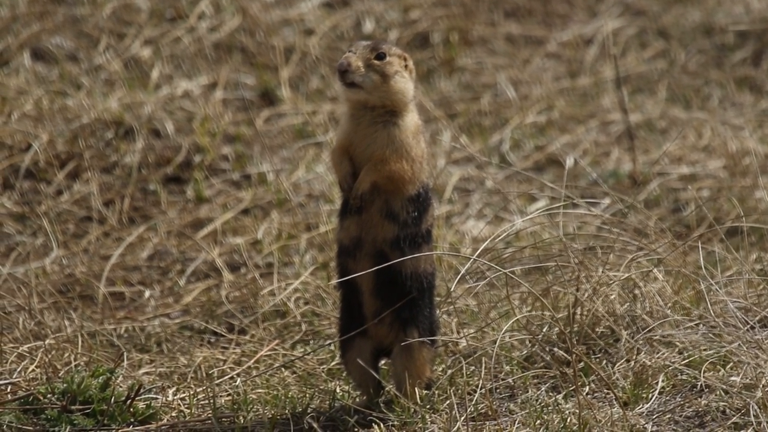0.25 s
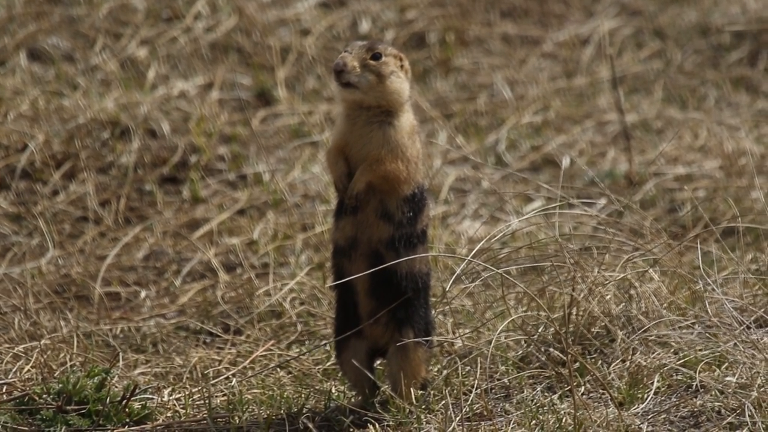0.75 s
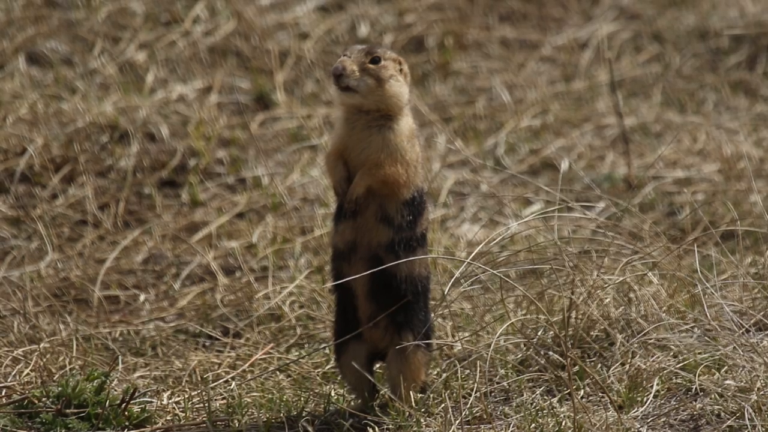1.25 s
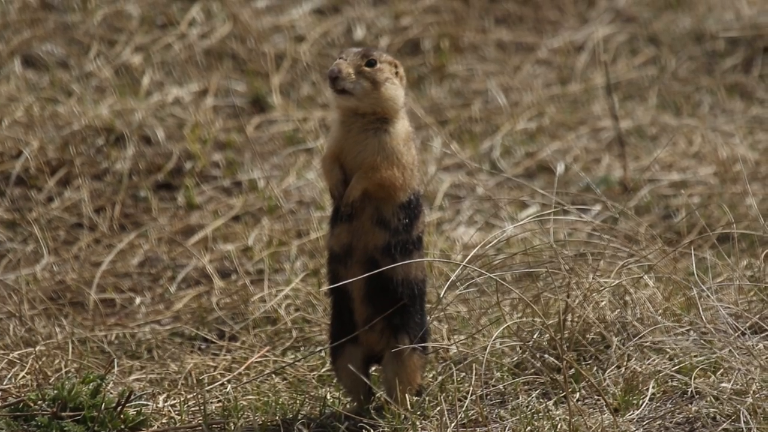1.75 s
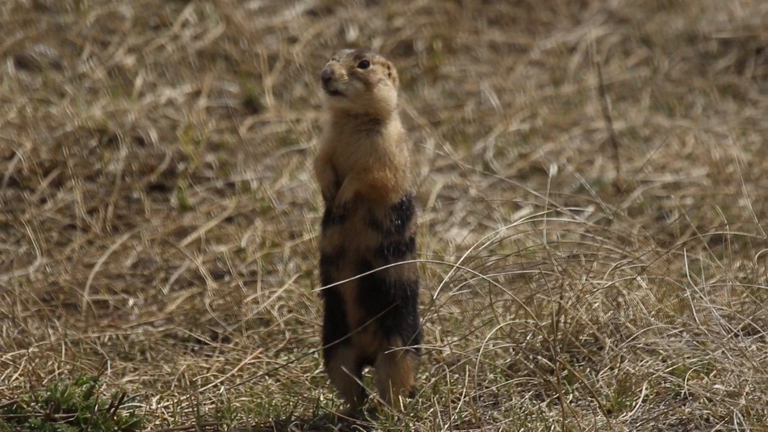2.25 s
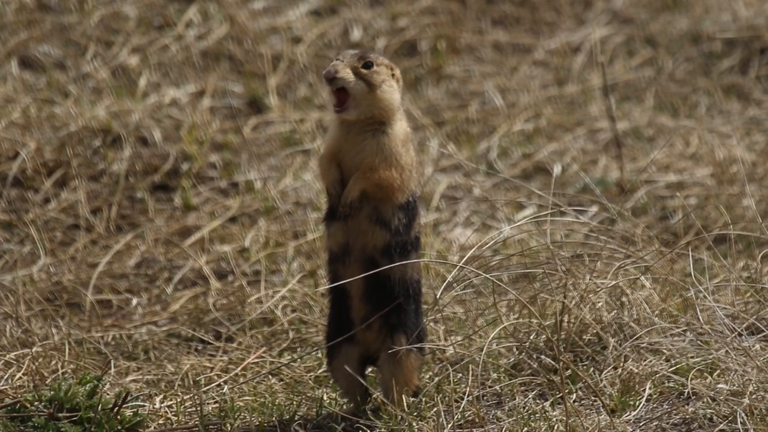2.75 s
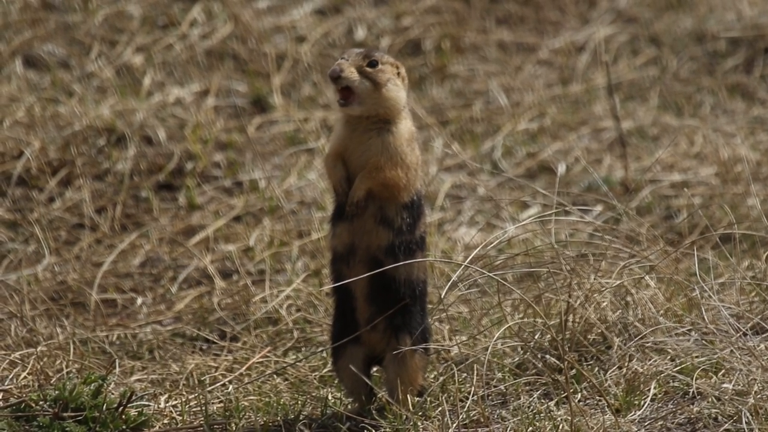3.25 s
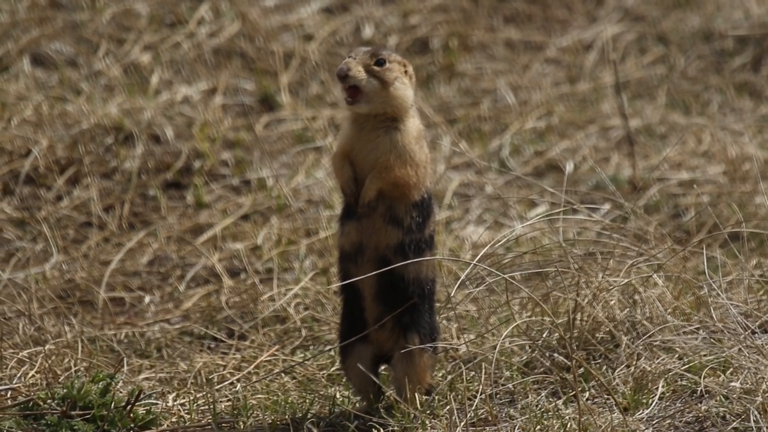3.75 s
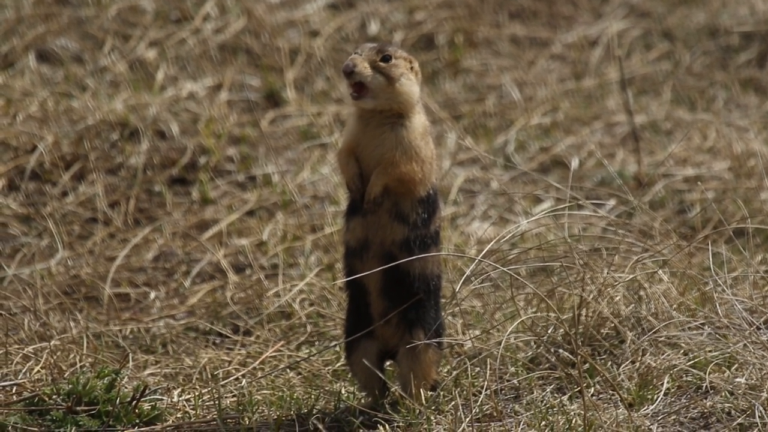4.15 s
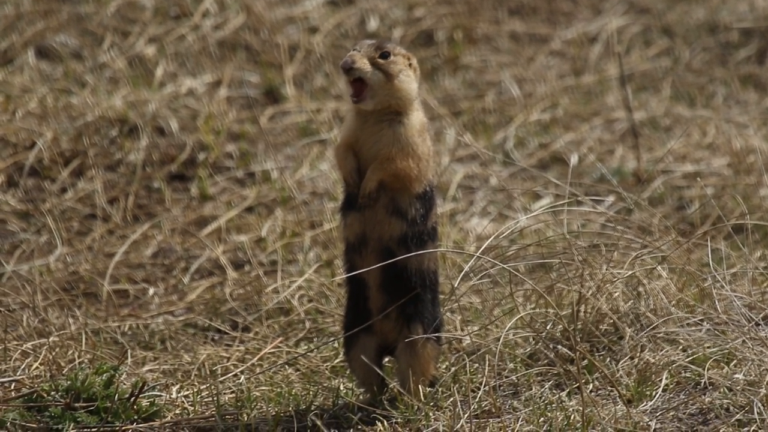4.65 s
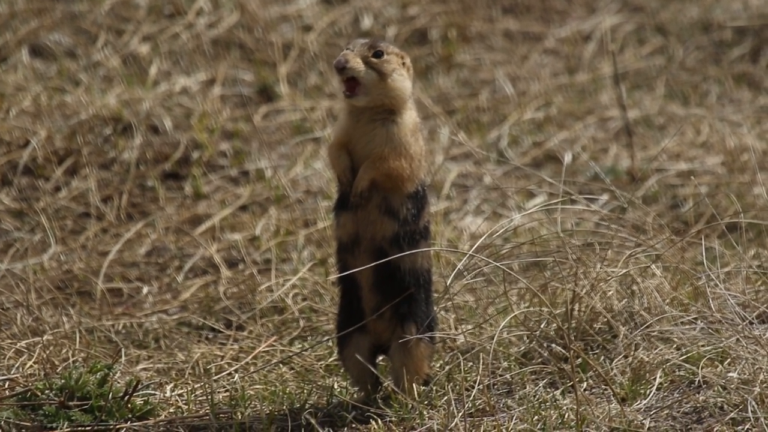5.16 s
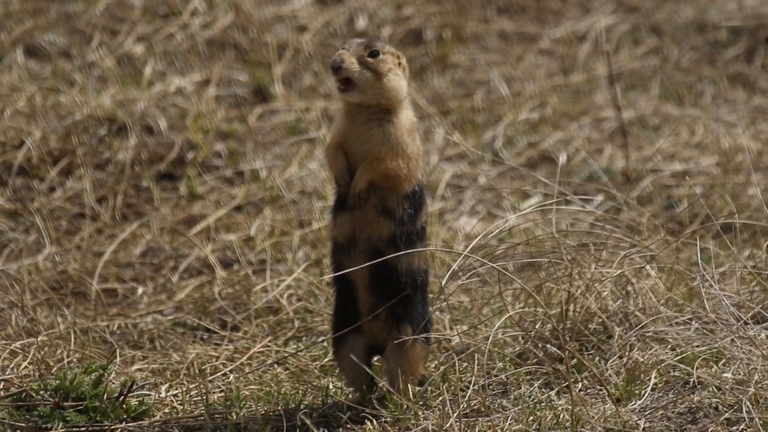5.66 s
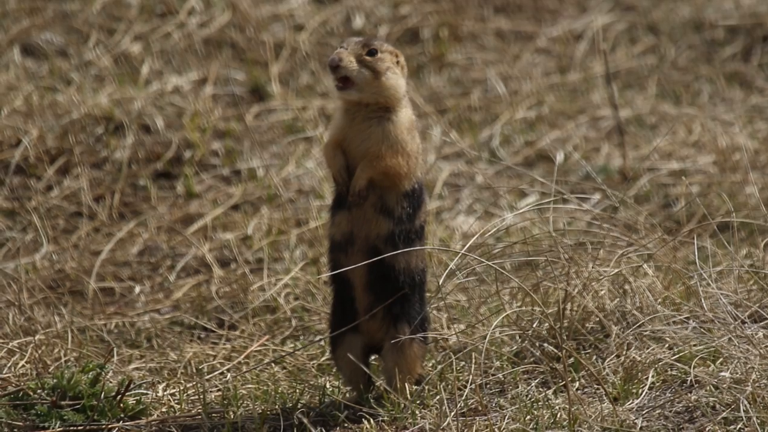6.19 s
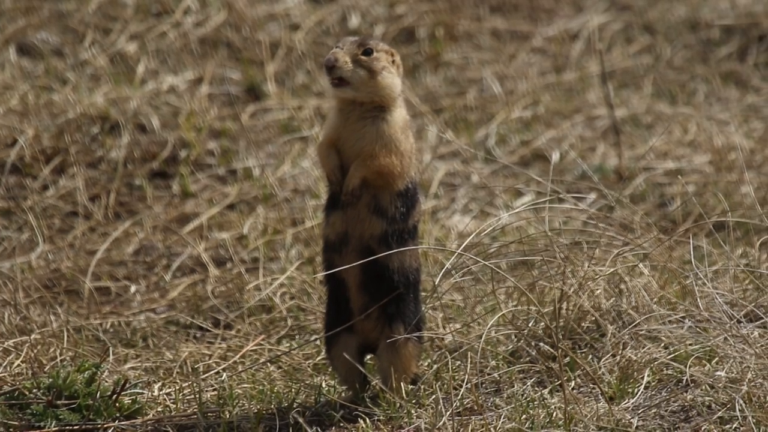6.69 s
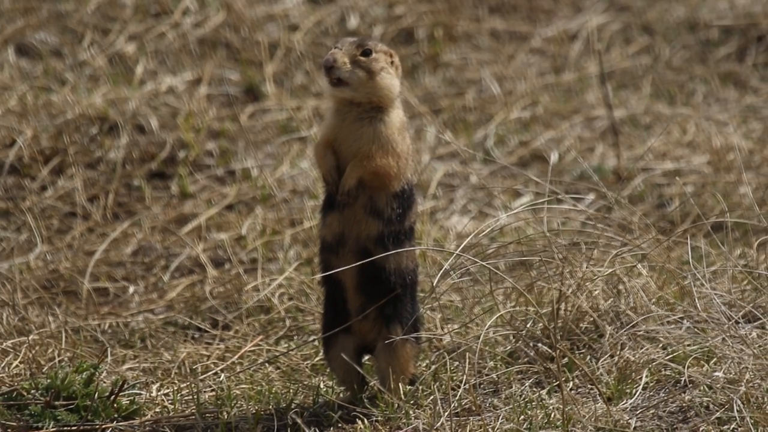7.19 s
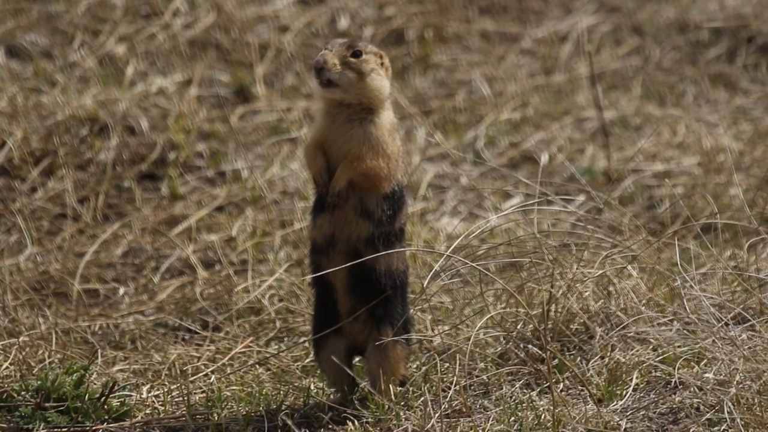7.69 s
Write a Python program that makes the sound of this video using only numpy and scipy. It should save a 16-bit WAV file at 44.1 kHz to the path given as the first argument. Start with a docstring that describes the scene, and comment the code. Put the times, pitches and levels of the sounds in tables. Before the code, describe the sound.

Uneven low wind buffets a microphone in open grassland as a small rodent repeats short, piercing yaps, with faint bird whistles after.

```python
"""From the start, gusts buffet a microphone in open grassland: shaped noise, with a suction dip for each eddy.
From two seconds a prairie dog wheezes, half voice and half hiss through a nearly shut mouth.
Then come nine alarm barks, trains of sharp vocal pulses whose pitch arches up and down; the last
wheezes fall among the first barks. The grass scatters a short tail behind the calls.
Afterwards far birds whistle faintly as gliding sines, and a grass stem ticks once, a burst of noise."""
import sys
import numpy as np
from scipy import signal
from scipy.fft import rfft, irfft
from scipy.io import wavfile
from scipy.ndimage import uniform_filter1d, map_coordinates

SR = 44100
rng = np.random.default_rng(int(sys.argv[2]) if len(sys.argv) > 2 else 0)


def inscribe(sig):
    """Save sig as 16-bit PCM at rate SR to the path in sys.argv[1].

    A 1-D sig is mono; a 2-D sig holds one channel per row.
    Samples are clipped to [-1, 1] before scaling.
    """
    pcm = np.round(np.clip(np.atleast_2d(sig).T, -1, 1) * 32767)
    wavfile.write(sys.argv[1], SR, pcm.astype(np.int16))


N = 349747
TIME = np.arange(N) / SR

# still air over the prairie and microphone hiss: (frequency [Hz], relative density [dB per Hz])
AIR_COLOUR = [(30, 5), (120, -1.5), (300, -3.5), (410, 4.5), (540, -3), (660, 0), (850, -8), (1700, -12),
              (2500, -10.5), (3300, -15), (4700, -19.5), (8000, -18), (15000, -23)]
# wind strength as rumble on the microphone, before puffs and trim: (time [s], level [dB])
WIND_STRENGTH = [(0, -25.5), (0.15, -26.5), (0.3, -47.5), (0.45, -47.5), (0.87, -22.5), (1.18, -29),
                 (1.36, -52.5), (1.44, -21), (1.63, -59), (1.72, -21), (2.0, -32.9), (2.09, -19.5),
                 (2.28, -35), (2.78, -30), (2.87, -37.5), (3.33, -36.5), (3.42, -29.5), (3.87, -29),
                 (4.2, -22.5), (5.3, -23.5), (5.7, -30.5), (5.85, -17.5), (5.98, -29.5), (6.38, -30),
                 (6.47, -49), (6.56, -25.5), (6.66, -44.5), (6.95, -64), (7.05, -32), (7.35, -44.5),
                 (7.55, -27.5), (7.7, -44), (7.87, -24), (7.93, -41)]
# deep rumble of the wind: (frequency [Hz], relative density [dB per Hz])
RUMBLE_COLOUR = [(20, -9), (35, -12.5), (60, 0.5), (95, 3), (150, -1), (220, -11.5), (320, -24),
                 (500, -54.5)]
# higher flutter of the wind: (frequency [Hz], relative density [dB per Hz])
FLUTTER_COLOUR = [(130, -14.5), (220, 2.5), (330, -0.5), (480, -11.5), (700, -20), (1000, -40.5),
                  (1600, -64)]
# single buffets, strong to slight, each an eddy hitting the microphone:
# (time [s], peak before trim [dB], half passing time [s])
BUFFET_EDDIES = [(.154, -8, 0.0026), (.572, -12, .003), (.7, -14.5, 0.0027), (.846, -7, .0015),
                 (1.024, -6, 0.00089), (1.062, -10, 0.00088), (1.146, -10, 0.0014), (1.285, -19.5, 0.0028),
                 (1.734, -12, 0.00074), (1.76, -8, 0.0017), (1.81, -4.5, 0.0015), (1.898, -9, 0.0013),
                 (2.11, -17, 0.0023), (2.205, -10, 0.00095), (2.362, -7, 0.0023), (2.94, -19, 0.0044),
                 (3.1, -16, 0.0045), (3.47, -20, 0.0031), (3.653, -9.5, 0.0014), (4.044, -14.5, 0.00098),
                 (4.223, -2.5, 0.0022), (4.356, -9.5, 0.0012), (4.417, 4, 0.0011), (4.47, -9, 0.00085),
                 (4.802, -8, 0.0014), (4.888, -4.5, 0.001), (4.924, -13.5, 0.00078), (5.037, -9, .002),
                 (5.146, -5, 0.00096), (5.337, -3, 0.0018), (5.401, -12, .0017), (5.789, -12.5, 0.00098),
                 (5.857, -5.5, 0.0019), (5.905, -15, 0.00081), (6.596, -17, 0.001), (7.463, -24, 0.00069)]
# a grass stem ticks: (time [s], level [dB], decay [s])
STEM_TICKS = [(7.541, -45, 0.0075)]
# colour of the tick: (frequency [Hz], relative density [dB per Hz])
STEM_COLOUR = [(400, -7), (1100, 6), (2000, -8), (4000, -16), (9000, -24)]
# far birds: (time [s], length [s], first pitch [Hz], last pitch [Hz], level [dB])
FAR_BIRDS = [(6.24, 0.057, 4700, 4500, -75), (6.37, .022, 6000, 5370, -64), (6.382, .025, 5500, 5900, -68),
             (6.656, 0.23, 3660, 2720, -68), (7.03, 0.089, 3610, 2950, -70.5),
             (7.38, 0.076, 4200, 3980, -74), (7.54, .1, 3550, 2920, -70)]
# colour of what ground and grass throw back: (frequency [Hz], relative density [dB per Hz])
SCATTER_COLOUR = [(600, 4), (1500, 0), (2600, 5.5), (4000, -0.5), (5500, -1), (8000, -1), (15000, -23)]
# wheezy half-voiced calls: (time of peak [s], rise [s], fall [s], level [dB], voiced share [0-1])
WHEEZE_CALLS = [(2.113, .0033, 0.023, -44, .8), (2.136, .014, 0.015, -44, 0.6),
                (2.238, .009, 0.014, -40.5, 0.64), (2.363, .012, 0.01, -39, 0.56),
                (2.429, .007, 0.012, -42.5, 0), (2.555, .0094, 0.013, -41, .36),
                (2.61, 0.0056, 0.013, -44.5, 0.06), (2.746, 0.0094, 0.056, -48, 0),
                (2.975, 0.012, 0.015, -50, .1), (3.112, .0094, 0.026, -47.5, 0.1),
                (3.166, 0.0064, 0.032, -51, .5)]
# resonances of the nearly shut mouth: (frequency [Hz], width [Hz], relative level [dB])
SHUT_MOUTH_MODES = [(2170, 610, 10.5), (3600, 1160, 1.5), (4060, 550, 5.5), (5800, 1200, -30),
                    (7680, 1540, 3), (10200, 1500, -7.5), (11200, 1400, -7.5)]
# barks: (start [s], crest [s], end [s], top pitch [Hz], attack level [dB])
ALARM_BARKS = [(2.7957, 2.839, 2.898, 1073, -17.5), (3.182, 3.23, 3.28, 1089, -17.5),
               (3.5578, 3.6014, 3.65, 1086, -17), (3.923, 3.961, 4.016, 1063, -17.5),
               (4.2954, 4.338, 4.385, 1060, -19), (4.696, 4.739, 4.783, 1035, -20),
               (5.131, 5.1777, 5.219, 1019, -22.5), (5.5233, 5.5647, 5.61, 1028, -19.5),
               (5.9214, 5.968, 6.011, 1049, -19.5)]
# throat and mouth resonances on the highest bark, before small differences from bark to bark:
# (frequency [Hz], width [Hz], level with the mouth open [dB], level with it closed [dB])
THROAT_MODES = [(820, 180, -44, -56), (2560, 380, 6.5, 5), (3180, 340, -7, -9.5), (3820, 850, 6.5, -7),
                (5180, 1630, -2, 3.5), (6260, 2000, -7.5, -14.5), (7230, 1070, -3.5, -0.5),
                (9550, 680, -7.5, -6), (10340, 890, -10, -22.5), (12400, 350, -17, -29),
                (14760, 600, -50, -43)]

AIR_DB = -55.5
# flutter grows faster than rumble: level in a moderate wind (dB), that wind (dB), dB gained per dB of wind
FLUTTER_DB, MODERATE_WIND_DB, FLUTTER_GROWTH = -48, -27, 1.55
# random eddies: rate, peak above the wind before trim (dB), spread (dB), middle half passing time (s)
EDDIES_PER_S, EDDY_DB, EDDY_SPREAD_DB, EDDY_PASSING_S = 10, 6, 1.5, 0.0012
# rough air around a buffet that passes in EDDY_PASSING_S, against its untrimmed peak (dB)
WAKE_RUMBLE_DB, WAKE_FLUTTER_DB = -15, -19.5
GROUND_DB = -14  # smeared bounce off the ground, against the direct sound
WHEEZE_HZ = 592  # pitch at the peak of a wheeze
# share of the top pitch missing at the start and end of a bark, before the floor on the arch
START_SAG, END_SAG = 0.62, 0.3
# aspiration before the folds pulse it: dB at the crest, dB added per unit of missing pitch share
CREST_RASP_DB, EDGE_RASP_DB = -21.5, 25
SLACK_HISS_DB = -24  # hiss through fully slack folds before its high-pass, against the voice
# first pulse, just after the crest, and as the mouth closes, against the attack level (dB)
ONSET_DB, CREST_DB, CLOSING_DB = -17, -5.5, -5.5
CUTOFF_HZ = 15900


def from_db(db):
    """Amplitude ratio of a level in dB."""
    return 10 ** (np.asarray(db) / 20)


def rms_one(x):
    """Scales a sound to rms 1."""
    return x / np.sqrt(np.mean(x ** 2) + 1e-20)


def even(x, window_s):
    """Holds the short-term rms at 1, leaving the faster lumps."""
    power = uniform_filter1d(x ** 2, size=int(window_s * SR))
    return x / np.sqrt(power + 1e-9)


def butter(x, hz, kind, order=2):
    """Causal low- or high-pass."""
    return signal.sosfilt(signal.butter(order, min(hz, .48 * SR), kind, fs=SR, output="sos"), x)


def noise(spectrum, size=N):
    """Noise with the given colour, falling away outside its end points; rms 1."""
    hz, db = np.transpose(spectrum)
    f = np.fft.rfftfreq(size, 1 / SR) + 1
    gain = from_db(np.interp(np.log(f), np.log(hz), db))
    gain = gain * np.minimum(1, hz[-1] / f) ** 2 * np.minimum(1, f / hz[0])
    return rms_one(irfft(rfft(rng.standard_normal(size)) * gain, size))


def drift(rate, size=N):
    """Smooth chance from about `rate` random knots a second, of spread 1 at the knots."""
    knots = np.arange(size) * rate / SR
    return map_coordinates(rng.standard_normal(size), [knots], order=3, mode="mirror")


def add(track, s, sound):
    """Mixes a sound in at time s."""
    i = int(s * SR)
    track[i:i + len(sound)] += sound[:N - i]


def air():
    """Still air and microphone hiss: steady coloured noise."""
    return from_db(AIR_DB) * noise(AIR_COLOUR)


def wind_db(t):
    """Strength of the wind at time t."""
    return np.interp(t, *np.transpose(WIND_STRENGTH))


def wake(rise_s, fall_s, speed_power):
    """Swell of rough air around the buffets; speed_power says how much more the fast ones count."""
    swell = np.zeros(N)
    for s, db, passing in BUFFET_EDDIES:
        weight = from_db(db) * (EDDY_PASSING_S / passing) ** speed_power
        away = (TIME - s) / np.where(TIME < s, rise_s, fall_s)
        swell += weight * np.exp(-np.minimum(away ** 2, 20))
    return swell


def wind(rumble_db, puff_db, puffs_per_s, rumble_lump_db, flutter_lump_db):
    """Wind on the microphone drops between puffs and swells at buffets; lumps shape flutter more than rumble."""
    strength_db = wind_db(TIME) + puff_db * np.clip(drift(puffs_per_s), -2, .5)
    flutter_db = FLUTTER_DB + FLUTTER_GROWTH * (strength_db - MODERATE_WIND_DB)
    rumble_wake = from_db(WAKE_RUMBLE_DB) * wake(rise_s=.014, fall_s=0.017, speed_power=0)
    flutter_wake = from_db(WAKE_FLUTTER_DB) * wake(rise_s=.013, fall_s=0.023, speed_power=0.78)
    low = np.hypot(from_db(strength_db + rumble_db), rumble_wake)
    high = np.hypot(from_db(flutter_db), flutter_wake)
    lumps = np.tanh(drift(55))
    rumble = low * even(noise(RUMBLE_COLOUR) * from_db(rumble_lump_db * lumps), window_s=0.07)
    flutter = high * even(noise(FLUTTER_COLOUR) * from_db(flutter_lump_db * lumps), window_s=0.06)
    return rumble + flutter


def random_eddies():
    """Random eddies that grow with the wind: (time [s], peak before trim [dB], half passing time [s])."""
    gap, size, speed = rng.random((200, 3)).T
    s = 0.036 + np.cumsum(2 * gap / EDDIES_PER_S)
    peak_db = wind_db(s) + EDDY_DB + EDDY_SPREAD_DB * (2 * size - 1)
    passing = EDDY_PASSING_S * 2 ** (speed - .5)
    rows = np.transpose([s, peak_db, passing])
    return list(rows[s < N / SR])


def eddies(gain_db, port_hz, core_share, core_width):
    """A passing eddy is brief suction with a tight core; the microphone's bass roll-off makes it swing back."""
    out = np.zeros(N)
    t = np.arange(-1500, 1500) / SR
    for s, db, passing in list(BUFFET_EDDIES) + random_eddies():
        core = core_share / (1 + (t / (passing * core_width)) ** 2)
        suction = 1 / (1 + (t / passing) ** 2) + core
        dip = butter(-np.hanning(len(t)) * suction, port_hz, "high")
        add(out, max(s + t[0], 0), from_db(db + gain_db) * dip / np.abs(dip).max())
    return out


def ticks():
    """A grass stem's dry snap: coloured noise that dies at once."""
    out, t = np.zeros(N), TIME[:SR // 10]
    for s, db, decay in STEM_TICKS:
        add(out, s, from_db(db) * noise(STEM_COLOUR, size=len(t)) * np.exp(-t / decay))
    return out


def birds():
    """Far, thin whistles: slightly unsteady sines whose glide flattens out."""
    out = np.zeros(N)
    for s, length, first_hz, last_hz, db in FAR_BIRDS:
        u = np.linspace(0, 1, int(length * SR))
        glide = last_hz + (first_hz - last_hz) * (1 - u) ** 1.7
        hz = glide * (1 + 0.0036 * drift(250, len(u)))
        whistle = np.sin(2 * np.pi * np.cumsum(hz) / SR) * np.sqrt(u) * (1 - u)
        add(out, s, from_db(db) * rms_one(whistle))
    return out


def grassland(x, ground_s, scatter_db, scatter_t60, far_db, far_t60):
    """A smeared bounce off rough ground, a short scatter from grass and mounds, and a faint far tail."""
    t = TIME[:SR]
    ground = noise(SCATTER_COLOUR, size=SR) * (t / ground_s) ** 2 * np.exp(-(t / ground_s) ** 2)
    near = noise(SCATTER_COLOUR, size=SR) * from_db(-60 * t / scatter_t60) * (1 - np.exp(-(t / 0.0055) ** 2))
    far = noise(SCATTER_COLOUR, size=SR) * from_db(-60 * t / far_t60) * (1 - np.exp(-t / .05))
    response = from_db(GROUND_DB) * rms_one(ground)
    response = response + from_db(scatter_db) * rms_one(near) + from_db(far_db) * rms_one(far)
    return x + signal.fftconvolve(x, response / np.sqrt(SR))[:N]


def resonate(x, modes, scale=1):
    """A tract with steep-sided resonances and dark valleys; causal, so each pulse stays a sharp spike."""
    size = 2 * len(x)
    f = np.fft.rfftfreq(size, 1 / SR)
    gain = sum(from_db(db) / (1 + (2 * (f - hz * scale) / width) ** 2) for hz, width, db in modes)
    # the folded cepstrum gives the minimum-phase response
    cepstrum = irfft(np.log(gain))[:len(x)]
    response = np.exp(2 * rfft(cepstrum, size) - cepstrum[0])
    return irfft(rfft(x, size) * response)[:len(x)]


def vocal_pulses(pitch, jitter):
    """One sharp pressure drop each time the folds close; also returns the cycle's phase."""
    hz = pitch * (1 + jitter * drift(688, len(pitch)))
    phase = 2 * np.pi * np.cumsum(hz) / SR
    k = np.arange(1, 40)[:, None]
    harmonics = np.cos(k * phase) * (k * pitch < SR / 2)
    return rms_one(-np.sum(harmonics, axis=0)), phase


def wheezes():
    """Soft calls before and among the first barks: weak pulses and hiss through the nearly shut mouth."""
    out, t = np.zeros(N), np.arange(int(.16 * SR)) / SR - .05
    for s, rise, fall, db, voiced in WHEEZE_CALLS:
        voiced = np.clip(voiced, 0, 1)
        pulses, _ = vocal_pulses(WHEEZE_HZ * (1 + 2.9 * t), jitter=0.016)
        source = np.sqrt(voiced) * pulses + np.sqrt(1 - voiced) * rng.standard_normal(len(t))
        sound = butter(resonate(source, SHUT_MOUTH_MODES), 1650, "high", order=4)
        swell = np.exp(-(t / np.where(t < 0, rise, fall)) ** 2 / 2)
        add(out, s + t[0], from_db(db) * rms_one(sound) * swell)
    return out


def bark(row, jitter, rise_power, fall_power, attack_s, release_s,
         throat_follow, gape_follow, mouth_s, throat_spread_db):
    """Pitch arches over the crest while the open mouth closes; the voice is raspier at both ends."""
    start, crest, end, top_hz, attack_db = row
    t = start + np.arange(int(.16 * SR)) / SR
    away = np.abs(t - crest) / np.where(t < crest, crest - start, end - crest)
    sag = np.where(t < crest, START_SAG * away ** rise_power, END_SAG * away ** fall_power)
    arch = np.clip(1 - sag, .36, 1)
    pulses, phase = vocal_pulses(top_hz * arch, jitter)
    rasp_level = from_db(CREST_RASP_DB + EDGE_RASP_DB * (1 - arch))
    source = pulses + rasp_level * (1 + np.cos(phase)) * rng.standard_normal(len(t))

    # more effort: shorter throat, wider gape
    effort = top_hz / max(other[3] for other in ALARM_BARKS)
    # no two barks alike: only the two level columns vary
    variation = rng.standard_normal((len(THROAT_MODES), 4)) * [0, 0, 1, 1]
    throat = np.array(THROAT_MODES) + throat_spread_db * variation
    opened = resonate(source, throat[:, [0, 1, 2]], effort ** throat_follow)
    closed = resonate(source, throat[:, [0, 1, 3]], effort ** throat_follow)
    gape = effort ** gape_follow * (1 - np.tanh((t - crest) / mouth_s)) / 2
    voice = butter(gape * opened + (1 - gape) * closed, 439, "high")

    # slack folds close softly and lose the top
    press = np.clip(effort * arch, 0, 1) ** 4.3
    soft = signal.sosfiltfilt(signal.butter(2, 10500, fs=SR, output="sos"), voice)
    voice = even(press * voice + (1 - press) * soft, window_s=.007)
    hiss = butter(rng.standard_normal(len(t)), 4000, "high")
    voice = voice + from_db(SLACK_HISS_DB) * (1 - arch ** 2) * hiss

    knots = [start, start + attack_s, start + 0.023, crest + 0.019, end - .012, end, end + release_s]
    shape_db = [ONSET_DB, -.5, 0, CREST_DB, CLOSING_DB, CLOSING_DB - 5.0, -46]
    level_db = attack_db + np.interp(t, knots, shape_db)
    return voice * from_db(level_db) * (t < end + release_s)


def barks():
    """The alarm series, each bark shaped by its own pitch and effort."""
    out = np.zeros(N)
    for row in ALARM_BARKS:
        sound = bark(row, jitter=0.0024, rise_power=2.4, fall_power=2.3, attack_s=0.012, release_s=0.048,
                     throat_follow=0.17, gape_follow=7.4, mouth_s=0.012, throat_spread_db=0.25)
        add(out, row[0], sound)
    return out


def scene():
    """The animal and the birds sound through the grassland; the wind acts on the microphone itself."""
    gusts = wind(rumble_db=0.5, puff_db=6.5, puffs_per_s=20, rumble_lump_db=7.5, flutter_lump_db=18.5)
    thumps = eddies(gain_db=-1.28, port_hz=136, core_share=0.18, core_width=0.7)
    calls = grassland(birds() + wheezes() + barks(), ground_s=0.0041,
                      scatter_db=-15, scatter_t60=0.11, far_db=-45.0, far_t60=2.6)
    return (air() + gusts + thumps + ticks() + calls)[None]


def record(dry):
    """The microphone signal clips at full scale, as on the strongest buffet; then the top is cut."""
    top_cut = signal.ellip(10, .1, 80, CUTOFF_HZ, fs=SR, output="sos")
    return signal.sosfilt(top_cut, np.clip(dry, -1, 1))


dry = scene()
out = record(dry)
inscribe(out)
```